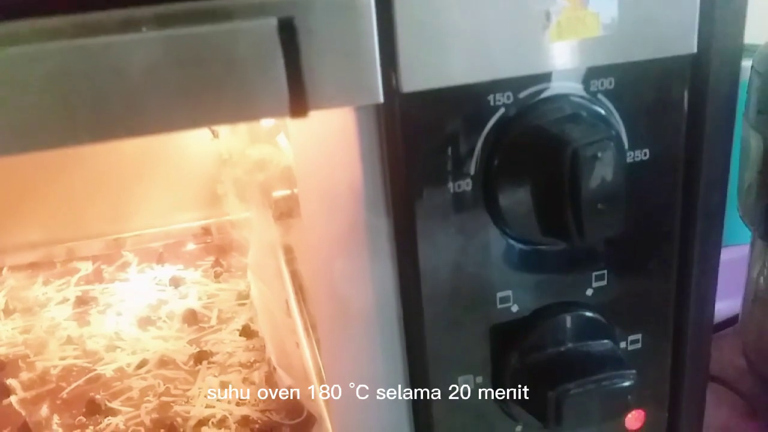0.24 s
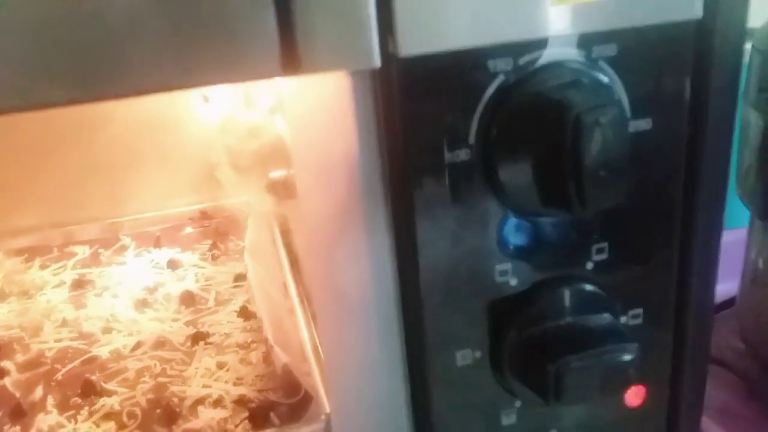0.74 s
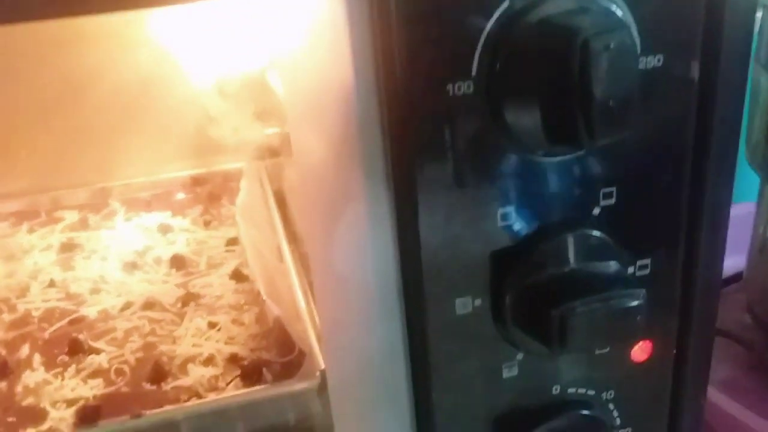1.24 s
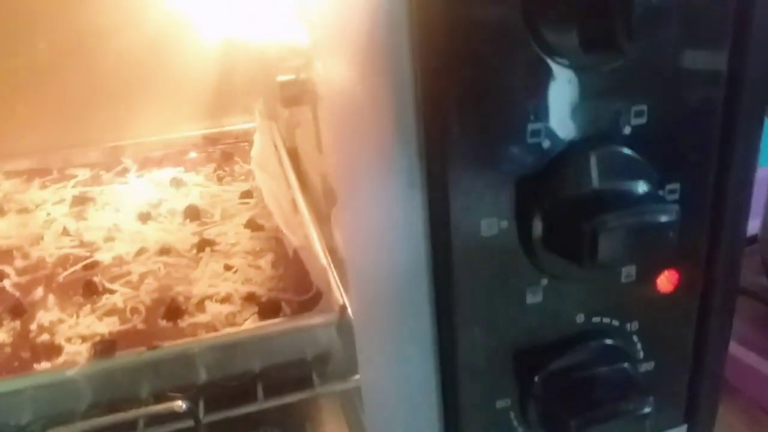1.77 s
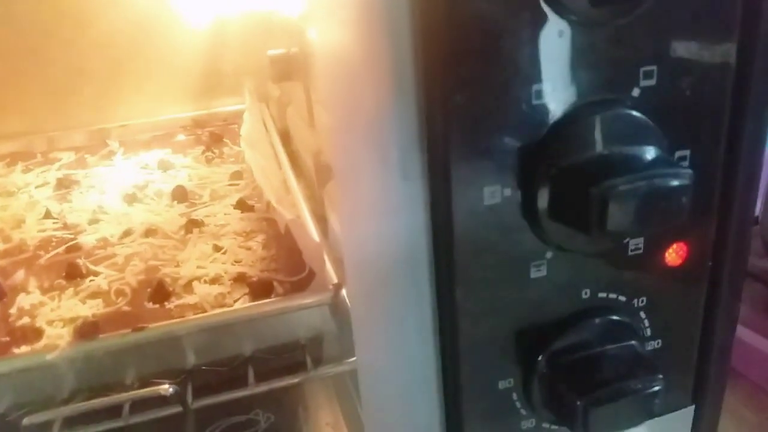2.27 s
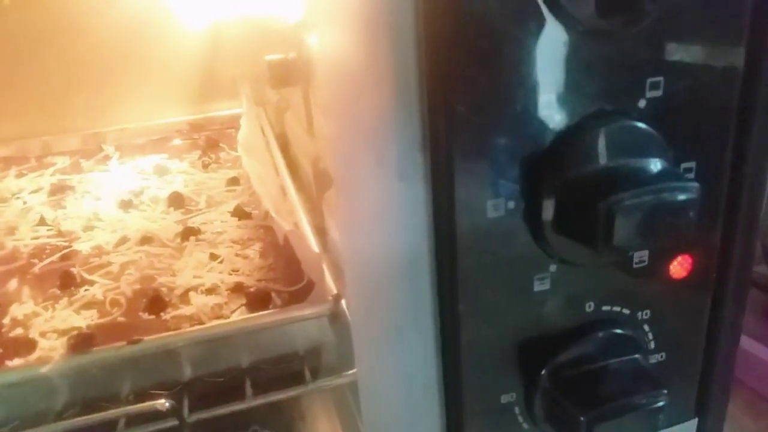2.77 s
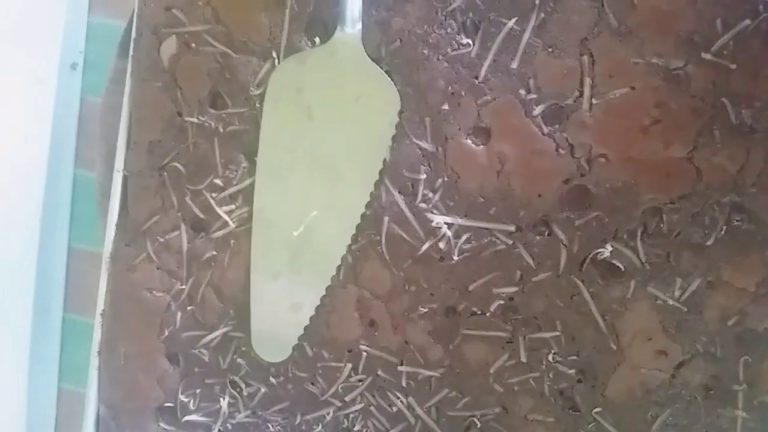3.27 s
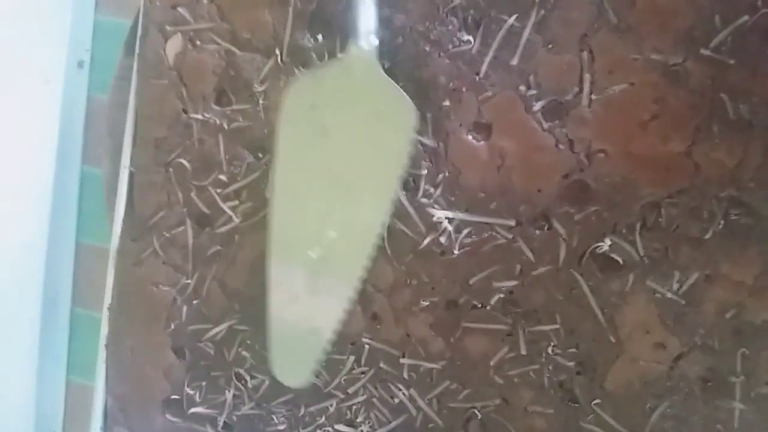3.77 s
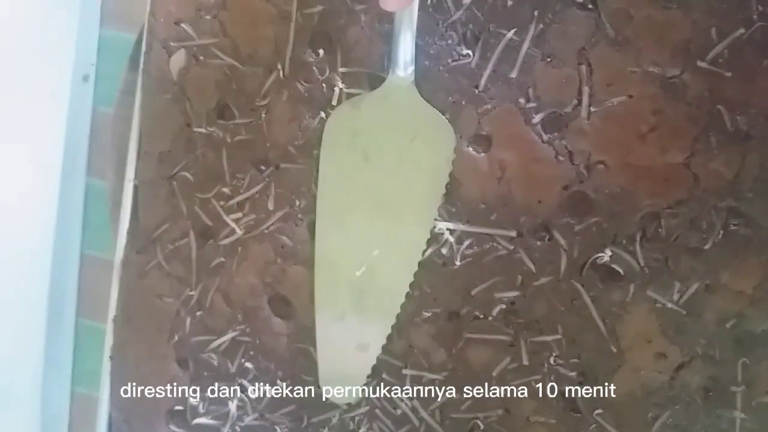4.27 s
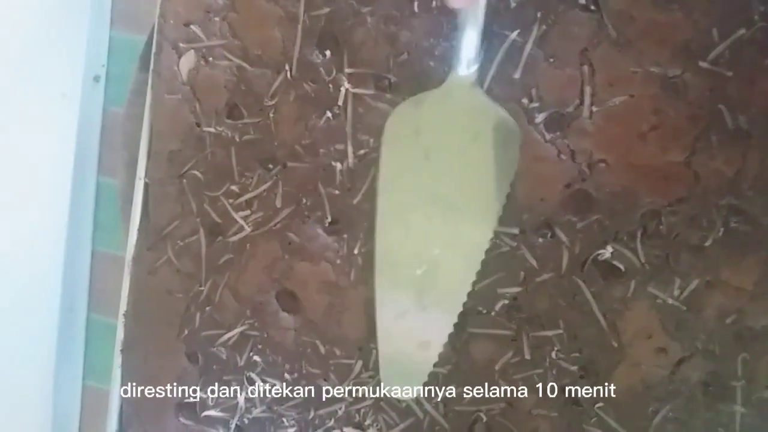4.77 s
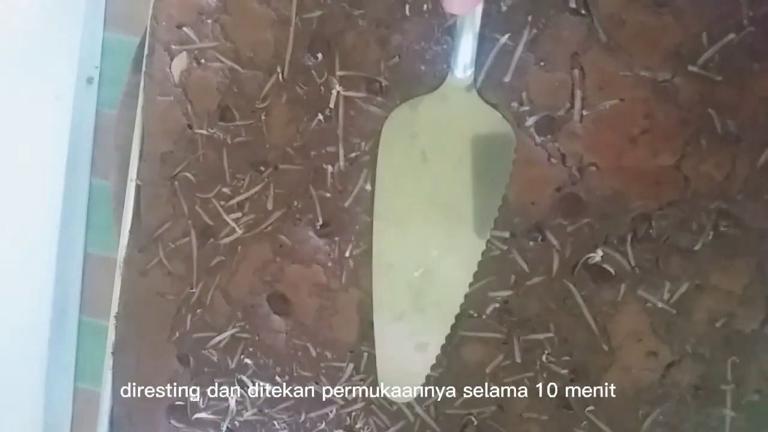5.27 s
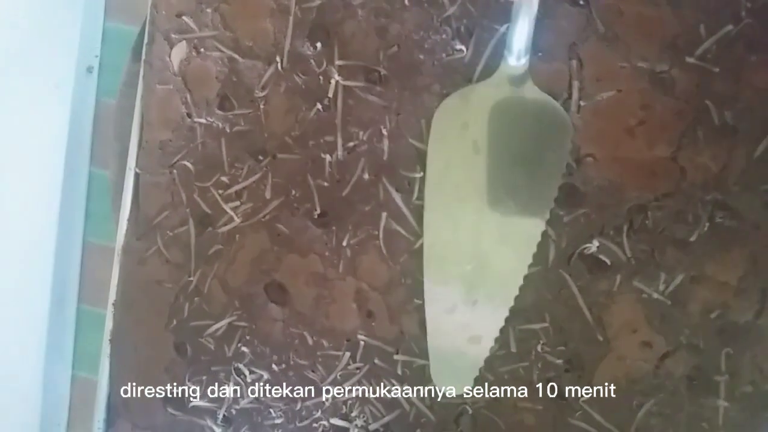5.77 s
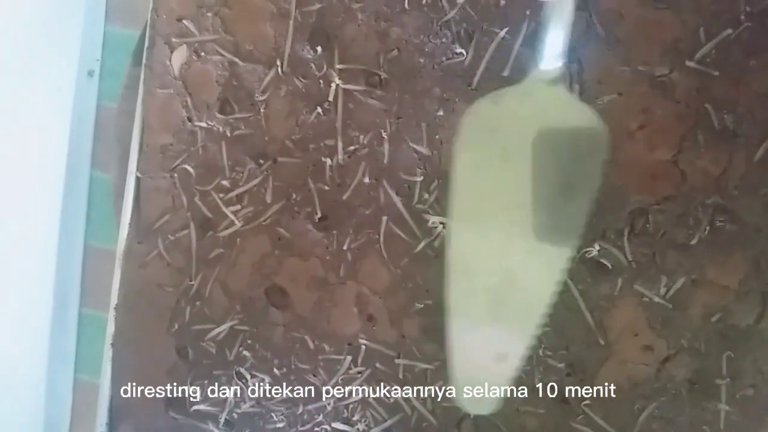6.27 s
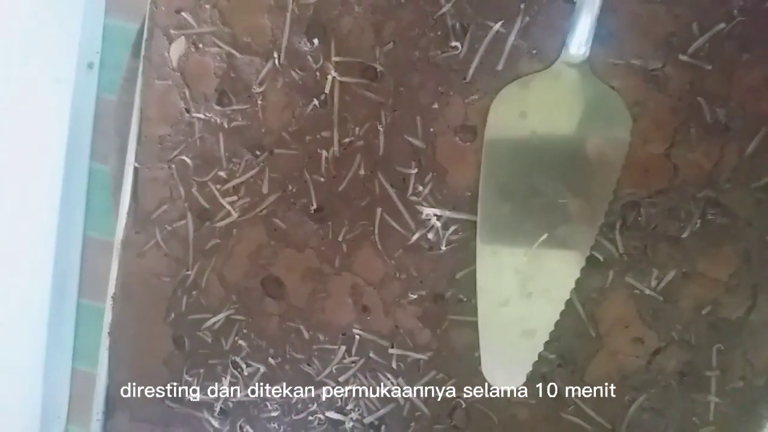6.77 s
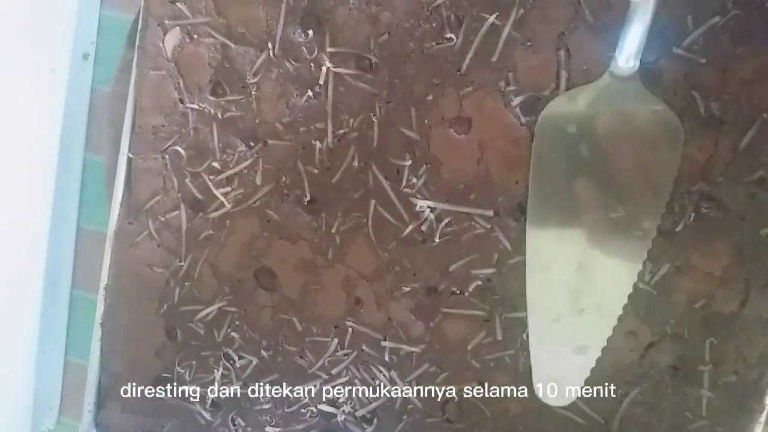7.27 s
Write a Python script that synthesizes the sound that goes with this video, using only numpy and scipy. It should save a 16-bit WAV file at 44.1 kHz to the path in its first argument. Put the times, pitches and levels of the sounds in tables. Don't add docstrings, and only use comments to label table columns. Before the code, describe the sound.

Close phone-like pickup in a quiet kitchen: bright, dry ticks and tocks alternate rapidly with a short ringing tail, while an engine idles faintly far off and draws nearer. An abrupt cut leads to a different moment: a deep, fluttering motorbike drone rises, roars, dips and swells again outside, far louder than before. Small knocks, crumbly crunches and hard steel clicks from a serving blade on a baked crust sit over it.

```python
import sys
import numpy as np
from scipy import signal
from scipy.fft import rfft, irfft, next_fast_len
from scipy.io import wavfile
from scipy.ndimage import uniform_filter1d

SR = 44100
rng = np.random.default_rng(int(sys.argv[2]) if len(sys.argv) > 2 else 0)


def voltage_ratio(level):
    return 10 ** (np.asarray(level, float) / 20)


def inscribe(sig):
    pcm = np.round(np.clip(np.atleast_2d(sig).T, -1, 1) * 32767)
    wavfile.write(sys.argv[1], SR, pcm.astype(np.int16))


N = 332514

# mode_hz, level_db, t60_s
TOCK_MODES = [(3770, -7, 0.11), (4320, 9, 0.022), (4850, -4, 0.029), (5200, 4, 0.036), (5900, -43, .015),
              (6370, -23, 0.016), (7080, -1, 0.018), (7440, 2, 0.016), (8200, -11, 0.048),
              (10100, -6, 0.016)]
# centre_hz, width_hz, level_db
CASING = [(831.4, 10, -6), (1657, 30, -9), (1906, 28, -9), (2486, 150, -11), (3144, 100, -9.5),
          (3960, 94, -16), (4270, 480, -10.5)]
NEARER_DB = 8


def unit(x):
    return x / np.sqrt(np.mean(x ** 2))


def curves(table):
    s, *columns = np.transpose(table)
    return [np.interp(np.arange(N) / SR, s, c) for c in columns]


def shape_db(table, hz):
    points = np.array(table)
    return np.interp(np.log(hz + 1), np.log(points[:, 0]), points[:, 1])


def noise(table, lo_hz, hi_hz, rings=()):
    size = next_fast_len(N, real=True)
    hz = np.fft.rfftfreq(size, 1 / SR) + 1
    edges = 1 / (1 + (lo_hz / hz) ** 6) / (1 + (hz / hi_hz) ** 6)
    lift = 1
    for centre_hz, width_hz, db in rings:
        lift = lift + voltage_ratio(db + 11.5) / (1 + ((hz - centre_hz) / (width_hz / 2)) ** 2)
    spectrum = rfft(rng.standard_normal(size)) * voltage_ratio(shape_db(table, hz)) * edges * lift
    return unit(irfft(spectrum, size)[:N])


def walk(rate):
    hold = int(SR / 32 / rate)
    held = np.repeat(rng.standard_normal(N // (32 * hold) + 2), hold)
    slewed = uniform_filter1d(uniform_filter1d(held, hold), hold)
    return 1.3 * np.interp(np.arange(N) / 32, np.arange(len(slewed)), slewed)


def decay(t60, length=.4):
    return np.exp(-np.log(1000) * np.arange(int(length * SR)) / SR / t60)


def add(out, s, sound):
    i = int(s * SR)
    out[i:i + len(sound)] += sound[:len(out) - i]


def strike(modes, rattle_s, rattle_db):
    t = np.arange(SR // 8) / SR
    chance = rng.standard_normal((len(modes), 2))
    ring = 0
    for (hz, db, t60), (louder, sharper) in zip(modes, chance):
        tone = np.sin(2 * np.pi * hz * (1 + 0.0073 * sharper) * t)
        ring = ring + voltage_ratio(db + 2.8 * louder) * decay(0.64 * t60, .13)[:len(t)] * tone
    force = decay(.0025) + voltage_ratio(rattle_db) * decay(rattle_s)
    contacts = rng.standard_normal(2048) * force[:2048]
    small = signal.butter(4, [3150, 9800], "band", fs=SR, output="sos")
    hit = signal.sosfilt(small, signal.fftconvolve(ring, contacts)[:len(t)])
    return hit / np.abs(hit).max()


def timer():
    # mode_hz, level_db, t60_s
    tick_modes = [(3200, -15, .12), (3790, -6, 0.036), (4350, 2, 0.029), (4800, 1, 0.025),
                  (5250, 5.5, 0.021), (6300, -8, 0.012), (6780, -0.5, 0.013), (7180, -7, 0.018),
                  (8130, -10, 0.022), (8350, -15, 0.024), (9960, -17, .015)]
    # corner_hz, level_db (per Hz)
    case = [(590, -38), (1000, -4), (1790, 4), (2230, 1), (3450, -6.5), (5100, -1), (6340, -4.5),
            (7360, -2.5), (9580, -11), (14000, -14), (15500, -19)]
    # centre_hz, width_hz, level_db
    tin = [(3620, 500, -6), (4340, 350, -20), (5180, 290, -8), (7200, 510, -24)]
    # (lead_s, level_db)
    tick = (.1481, -22.5, [(.0152, -46), (.035, -62)])
    tock = (.3857, -24, [(.0368, -46.5), (0.027, -64)])
    tick_db = (-41.5, -41, -40, -39.5, -41, -41)
    tock_db = (-42.5, -39.5, -42, -40.5, -40.5, -40)
    beat_s = .4777
    dry, dull, bright = np.zeros(N), np.zeros(N), np.zeros(N)
    add(dull, 0, voltage_ratio(-71.5) * decay(0.32))
    add(bright, 0, voltage_ratio(-77) * decay(0.23))
    ways = ((tick, tick_db, tick_modes, -15), (tock, tock_db, TOCK_MODES, -20))
    for (first, drop_tail_db, touches), drops_db, modes, rattle_db in ways:
        blows = [(0.00066, drops_db, drop_tail_db, modes, 0.039, rattle_db, 4)]
        for lead, db in touches:
            levels_db = db + 1.1 * rng.standard_normal(len(drops_db))
            blows.append((lead, levels_db, -31.5, TOCK_MODES, .03, -12, -7))
        for lead, levels_db, tail_db, ring, rattle_s, shake_db, blow_db in blows:
            for beat, db in enumerate(levels_db):
                s = first - lead + beat_s * beat
                tilt_db = 2.1 * rng.standard_normal()
                dull_tail = decay(0.42) + 0.62 * decay(0.097)
                bright_tail = decay(0.36) + 2.2 * decay(0.031)
                add(dry, s + .0008, voltage_ratio(db + blow_db) * strike(ring, rattle_s, shake_db))
                add(dull, s + 0.0033, voltage_ratio(db + tail_db - tilt_db) * dull_tail)
                add(bright, s + 0.0041, voltage_ratio(db + tail_db + tilt_db) * bright_tail)
    tail = dull * noise(case, 3080, 4340, tin) + bright * noise(case, 3800, 11700, tin)
    body = voltage_ratio(-21.5) * dull * noise(case, 570, 2800)
    panel = voltage_ratio(-7.5) * uniform_filter1d(dull, SR // 20) * noise(case, 4950, 5400)
    return dry + panel + (tail + body) * voltage_ratio(1.2 * walk(60))


def nearer():
    arrives_s, arrival_s = 1.71, 0.13
    return np.clip((np.arange(N) / SR - arrives_s) / arrival_s, 0, 1)


def idle():
    # start_s, pitch_hz, level_db
    sixth = [
        (0.0, 122.3, -67),
        (0.1, 128.7, -71),
        (0.76, 129.3, -66.5),
        (0.84, 127, -74),
        (1.21, 134.4, -69),
        (1.41, 130, -73),
        (1.5, 133.2, -73),
        (1.83, 129.4, -65.5),
        (2.89, 130.6, -63.5),
    ]
    # multiple, level_db
    orders = [(3, 7), (4, 13), (7, 10), (8, 3), (13, 2.5)]
    hz, db = curves(sixth)
    phase = 2 * np.pi * np.cumsum(hz) / SR / 6
    out = voltage_ratio(db) * np.cos(6 * phase + walk(6))
    others_db = -94 + 1.53 * NEARER_DB * nearer()
    for k, order_db in orders:
        out += voltage_ratio(others_db + order_db + 1.8 * walk(3.8)) * np.cos(k * phase + 1.25 * walk(7.6))
    return np.sqrt(2) * out


def rub():
    # start_s, level_db
    touches = [
        (.76, -68),
        (1.77, -70.5),
        (2.79, -70),
    ]
    attack_s, hold_s, t60_s = 0.014, 0.062, 0.44
    t, touch = np.arange(SR // 2) / SR, np.zeros(N)
    for s, db in touches:
        fall_db = 60 * np.maximum(t - hold_s, 0) / t60_s
        add(touch, s, voltage_ratio(db - fall_db) * np.minimum(t / attack_s, 1))
    return touch * noise([(800, 0), (1800, -8.0), (3800, -1.0)], 910, 5700)


def kitchen():
    # corner_hz, level_db (per Hz)
    room = [(18, -35), (30, -22), (66, 1), (123, -4.5), (152, -7), (202, -12), (292, -14.5), (467, -26),
            (2490, -32), (3590, -31), (5170, -27.5), (5890, -36.5), (15500, -32)]
    rumble_db, drone_db = -66, -84.5
    bass = voltage_ratio(rumble_db + 0.63 * walk(22) + 1.4 * walk(3.06)) * noise(room, 40, 173)
    drone = voltage_ratio(drone_db + NEARER_DB * nearer() + 2.4 * walk(4.53)) * noise(room, 183, 390)
    hiss = voltage_ratio(-74.0) * noise(room, 310, 27000)
    return bass + drone + idle() + rub() + hiss


def strays():
    # start_s, peak_db
    grazes = [
        (1.3315, -51),
        (.379, -58),
    ]
    # start_s, pitch_hz, level_db
    appliance = (2, 14002, -91)
    t, out = np.arange(N) / SR, np.zeros(N)
    for s, db in grazes:
        add(out, s, voltage_ratio(db) * strike(TOCK_MODES, .02, -12))
    start, hz, db = appliance
    onset = np.clip((t - start) / .08, 0, 1)
    tone = np.sin(2 * np.pi * hz * t + .8 * walk(30))
    return out + np.sqrt(2) * voltage_ratio(db + 2.5 * walk(12)) * onset * tone


def server():
    # start_s, peak_db, t60_s, centre_hz
    knocks = [(2.793, -52, .09, 2700), (7.312, -41, .1, 1000), (3.59, -37, .13, 890),
              (3.6, -37, 0.093, 1800), (3.581, -35.5, 0.3, 4300), (3.581, -35.5, 0.17, 6360),
              (6.725, -37, 0.076, 2428), (3.585, -47, .1, 2900), (7.33, -36.5, 0.13, 1006),
              (7.33, -38, .1, 649), (7.33, -36.5, 0.09, 5250), (7.355, -44, 0.053, 5440),
              (7.49, -39, 0.085, 889)]
    # start_s, peak_db, t60_s, centre_hz
    clicks = [(3.5809, -50, .02, 5500), (6.7316, -36, .014, 5000), (6.738, -44, .01, 7000),
              (6.7474, -37, .02, 4500), (6.7588, -23, .007, 6500), (6.759, -25, .009, 2100),
              (6.761, -36, .02, 9000), (6.773, -35, .008, 7010), (6.7985, -34, .014, 11000),
              (6.8035, -28, .014, 8000), (7.0497, -34, .008, 7500), (7.1702, -46, .01, 6000),
              (7.3295, -38, .014, 6020), (7.4366, -42, .01, 4505)]
    # centre_hz, peak_db
    blade = [(5200, -30), (7700, -34), (8630, -34), (10400, -33)]
    blade_s, blade_t60_s = 6.7588, 0.011
    blade_rings = [(blade_s, db, blade_t60_s, hz) for hz, db in blade]
    out = np.zeros(N)
    for events, spread in ((clicks, 2.4), (knocks, 1.12), (blade_rings, 1.05)):
        for s, db, t60, hz in events:
            limits = [hz / spread, min(hz * spread, .45 * SR)]
            band = signal.butter(2, limits, "band", fs=SR, output="sos")
            burst = signal.sosfilt(band, rng.standard_normal(int(.4 * SR))) * decay(t60)
            add(out, s, voltage_ratio(db - 7.5) * burst / np.abs(burst).max())
    return out


def exhaust(phase, hz, level_db, tilt_db):
    # corner_hz, level_db
    pipe = [(24, -54), (40, -59), (59, -10), (136, -1.5), (159, -3), (179, -18), (224, -8), (318, -14.5),
            (337, -16), (371, -31), (418, -17.5), (700, -44.5), (910, -68), (1540, -120)]
    pipe_db = (2.5, 0.5, -5.5, -4.5)
    # start_s, length_s, partial, gain_db
    echoes = [(2.933, 0.32, 10, 10), (2.94, 0.5, 8, 4.5), (2.94, 1.32, 8, 12.5), (2.98, 1.71, 16, 11),
              (3.66, 0.9, 15, 7.5), (3.752, 0.52, 14, 10), (3.824, 0.18, 11, 5), (3.82, 0.52, 12, 8),
              (4.264, 0.29, 9, 9), (4.408, 0.69, 6, 5), (4.456, 0.49, 7, 3), (4.575, 0.8, 14, 7),
              (4.704, 0.46, 17, 10.5), (4.74, 0.96, 18, 10.5), (4.901, 0.3, 13, 15), (4.95, 0.48, 10, 10.5),
              (5.06, 0.58, 19, 3), (5.142, 0.2, 8, 14), (5.258, 0.4, 15, 16), (5.26, 0.93, 9, 8.5),
              (5.74, 0.6, 19, 9), (5.74, 1.9, 15, 8), (6.248, 0.76, 14, 12), (6.585, 0.2, 12, 8),
              (6.58, 2.03, 8, 9), (7.219, 0.31, 13, 12), (7.35, .2, 7, 8), (3.42, .42, 3, 12),
              (3.498, 0.23, 7, 8.5), (4.12, 0.25, 8, 9), (4.38, .5, 4, 2.5), (4.62, 0.33, 7, 8),
              (5.1, .65, 2, 14), (5.15, 0.33, 11, 9), (4.15, 0.44, 16, 6.5), (4.4, 0.24, 12, 6),
              (4.983, .55, 16, 7.5), (5.85, 0.37, 17, 8.5), (5.46, .18, 6, 7.5), (6.2, .25, 12, 8),
              (6.78, .16, 9, 9.5), (7.15, .3, 11, 7), (5.48, 0.24, 8, 4), (5.75, 0.31, 11, 3.5),
              (6.58, .3, 8, 9), (2.93, .18, 8, 10), (5.25, .2, 14, 9), (4.38, .4, 11, 5),
              (5.94, .16, 11, 8)]
    # start_s, length_s, partial, gain_db
    dips = [(3.101,1.54,3,-34), (3.9,1.03,4,-11.5), (4.5,0.45,10,-7), (4.6,0.63,11,-7), (5.15,0.69,7,-16),
            (5.3,0.33,6,-33), (5.3,0.24,5,-3), (5.3,1.65,3,-11), (5.575,0.96,4,-17), (5.98,1.4,10,-5),
            (6.15,0.33,12,-5), (6.78,0.87,6,-10.5), (7.0,.54,14,-9), (2.94, 1.04, 18, -9),
            (3.1, .4, 8, -8), (5.0, 0.37, 16, -10), (5.1, 0.43, 18, -5.5), (5.95, .25, 5, -5.5),
            (3.298, .25, 5, -13), (6.85, .15, 6, -7), (7.2, .34, 12, -4), (3.4, 0.37, 8, -16),
            (4.0, .3, 11, -12), (3.95, .45, 7, -10), (4.26, .28, 19, -12), (4.4, .4, 13, -9),
            (4.6, .34, 9, -8), (4.62, .28, 10, -7), (4.63, .16, 8, -16), (4.26, .16, 14, -12),
            (4.14, .16, 18, -12), (4.03, .38, 20, -8), (5.1, .3, 14, -9), (5.05, .26, 17, -14),
            (5.22, .2, 13, -9), (5.75, .35, 7, -10), (5.82, 0.14, 8, -12), (5.6, .28, 13, -9),
            (5.95, .15, 4, -9), (6.06, .3, 10, -9), (5.58, .16, 10, -10), (6.32, 0.39, 7, -11),
            (6.66, .16, 11, -8), (6.66, .26, 13, -10), (6.66, .16, 15, -12), (6.9, 0.15, 7, -10),
            (7.2, .34, 9, -9), (7.15, 0.25, 16, -11), (4.1, .32, 13, -13), (6.2, .28, 11, -10)]
    out = 0
    uneven = .012 * walk(22)
    for k in range(2, 24):
        group = (k > 4) + (k > 6) + (k > 12)
        swell_db = (0.9, 0.7, 2.94, 3.32)[group] * walk(7) + tilt_db * np.log2(k / 5.6) + pipe_db[group]
        for start, length, partial, db in echoes + dips:
            if k == round(partial):
                add(swell_db, start, db * np.sqrt(np.hanning(int(length * SR))))
        rough = .021 * walk(14)
        late = 0.913 * k - 0.0699 * k ** 2 + k * (0.1 * walk(1.498) + uneven + rough)
        gain = voltage_ratio(shape_db(pipe, k * hz[::8]) + swell_db[::8])
        out += gain * np.cos((k * phase - late)[::8])
    return voltage_ratio(level_db) * signal.resample_poly(out, 8, 1)[:N]


def casing():
    # start_s, end_s, pitch_hz, level_db (over the rasp)
    swells = [(4.0, 4.55, 1900, -.6), (4.0, 4.42, 1623, -2), (3.8, 4.15, 2490, -3.5),
              (4.3, 4.94, 2500, -1.5), (4.35, 5.06, 3160, 0.5), (3.2, 3.95, 4150, -8.5),
              (4.4, 4.72, 4100, 1), (4.75, 4.95, 4120, 2.5), (5.75, 6.65, 3170, 1.5), (6.9, 7.6, 3100, -5),
              (6.6, 7.1, 4050, -3.5), (7.25, 7.6, 4050, 0), (5.9, 7.1, 1900, -7), (5.6, 6.1, 903, 0.5),
              (6.84, 6.98, 2430, 6), (6.86, 7.0, 990, 8)]
    out = np.zeros(N)
    for start, end, hz, db in swells:
        size = int((end - start) * SR)
        nearest = min(CASING, key=lambda mode: abs(mode[0] - hz))
        width = nearest[1] + 25
        ring = signal.lfilter(*signal.iirpeak(hz, hz / width, SR), rng.standard_normal(2 * SR))[:size]
        add(out, start, voltage_ratio(db) * np.sqrt(np.hanning(size)) * unit(ring) * voltage_ratio(2.8 * walk(8.5)[:size]))
    return out


def mechanics(phase, bark_db):
    # start_s, rasp_db, whine_db (relative)
    rasp = [(2.93, -75, 3), (3.16, -67.5, 4.5), (3.38, -63, 3), (3.53, -60.5, 1), (3.7, -56, 1.5),
            (4.19, -53, 1), (4.32, -52, 0), (4.8, -58, 3), (5.73, -64.5, 1.5), (5.92, -65, 4.5),
            (6.24, -61.5, 6.5), (6.79, -58, 2), (7.17, -61.5, 6.5), (7.54, -62.5, 10.5)]
    # corner_hz, level_db (per Hz)
    road_shape = [(18, -58), (30, -20), (83, -15), (137, -6), (192, -9.5), (455, -17), (747, -34),
                  (852, -34), (1360, -34), (1910, -31), (2180, -36.5), (4090, -38), (5450, -48),
                  (8280, -56), (15500, -61)]
    rasp_db, whine_db = curves(rasp)
    head_on_db, turns_s = 2.2, 4.4
    roar_db = 3.5 + head_on_db * np.clip(turns_s - np.arange(N) / SR, 0, 1)
    hiss_db = -2.5 + 0.36 * whine_db + 1.0 * walk(25)
    hiss = noise(road_shape, 4950, 20000, [(6310, 200, -11), (8170, 470, -12.0)])
    out = voltage_ratio(hiss_db) * hiss + casing()
    bands = ((540, 1360, roar_db), (1320, 2530, -1.1), (2230, 4630, whine_db - 1.5))
    for lo_hz, hi_hz, db in bands:
        out += voltage_ratio(db + 1.2 * walk(15)) * noise(road_shape, lo_hz, hi_hz, CASING)
    waver = voltage_ratio(0.56 * np.cos(phase) + 0.58 * walk(30))
    road = voltage_ratio(1.47 * walk(8)) * noise(road_shape, 39, 750)
    return voltage_ratio(rasp_db) * waver * out + voltage_ratio(bark_db) * road


def crumbs():
    # start_s, length_s, level_db
    rustles = [
        (3.576, 0.095, -63),
        (7.205, 0.06, -63),
        (7.327, .05, -56.5),
    ]
    cracks_per_s = 1900
    cracks = np.zeros(N)
    for s, length, db in rustles:
        chance = rng.random((2, int(length * SR)))
        add(cracks, s, voltage_ratio(db) * unit((chance[0] < cracks_per_s / SR) * np.log(chance[1])))
    grain = unit(rng.standard_normal(256) * decay(.006)[:256]) / 16
    grit = signal.fftconvolve(cracks, grain)[:N]
    out = np.zeros(N)
    for hz, q, db in ((5270, 3.4, 12.0), (8000, 6.6, 1), (10900, 5.8, 2.6)):
        out += voltage_ratio(db) * signal.lfilter(*signal.iirpeak(hz, q, SR), grit)
    return out


def scene():
    # start_s, end_s
    cut_s = (2.892, 2.933)
    # start_s, firing_hz, exhaust_db, brightness_db (per octave)
    ride = [(2.93, 21.8, -51, 4.5), (3.29, 23.28, -36.5, 3.5), (3.56, 23.39, -34.5, 3.5),
            (3.76, 23.1, -36, 2.5), (3.95, 24.4, -29, 2.5), (4.25, 24.65, -25.5, 0.2),
            (4.68, 24.88, -27, 3.5), (4.86, 25.31, -29.5, 3), (5.18, 25.77, -32, 2.5),
            (5.4, 25.17, -36.5, 3.5), (5.6, 24.99, -32.5, 2.2), (5.95, 24.85, -27.5, -2.5),
            (6.28, 24.63, -29, -4.5), (6.58, 25.11, -32, -2), (6.77, 24.52, -31.5, -0.5),
            (7.0, 25.68, -32.5, -1.0), (7.3, 26.2, -35.5, 1.5), (7.54, 26.03, -39, 1.1)]
    t = np.arange(N) / SR
    hz, level_db, tilt_db = curves(ride)
    phase = 2 * np.pi * np.cumsum(hz) / SR
    bike = exhaust(phase, hz, level_db, tilt_db) + mechanics(phase, level_db + 0.98 * tilt_db - 14.0)
    first = np.clip((cut_s[0] - t) / 0.0039, 0, 1) * (timer() + kitchen() + strays())
    second = np.clip((t - cut_s[1]) / 0.00295, 0, 1) * bike + server() + crumbs()
    return (first + second)[None]


def top_cut(x):
    return signal.sosfilt(signal.butter(12, 15730, fs=SR, output="sos"), x)


def record(dry):
    low_pass = signal.ellip(10, .2, 80, 15430, fs=SR, output="sos")
    return top_cut(signal.sosfilt(low_pass, dry))


dry = scene()
out = record(dry)
inscribe(out)
```